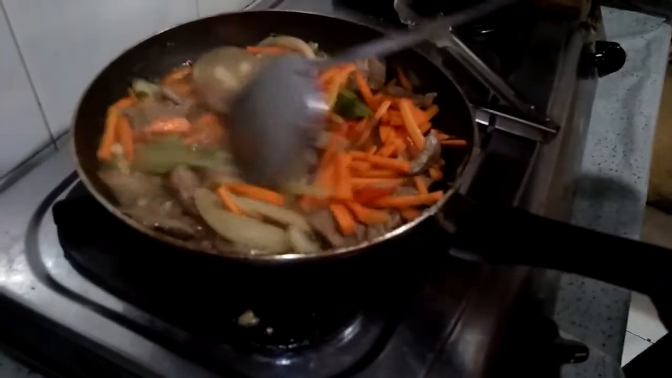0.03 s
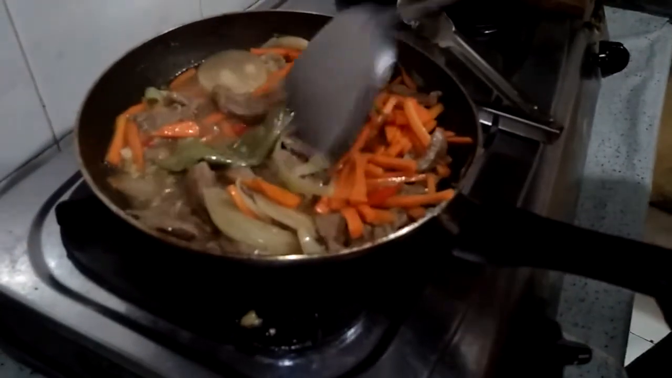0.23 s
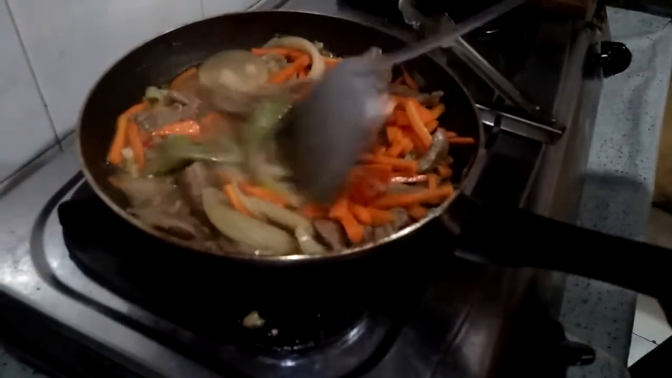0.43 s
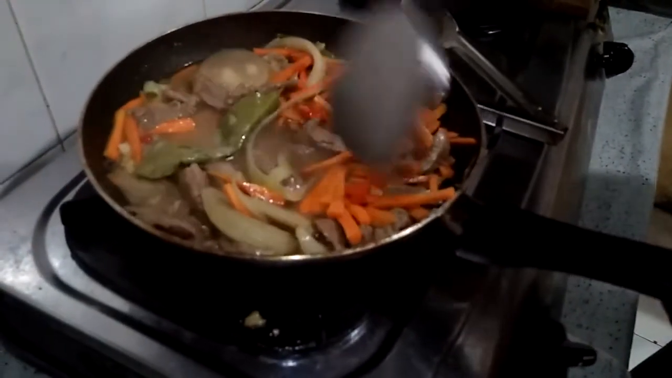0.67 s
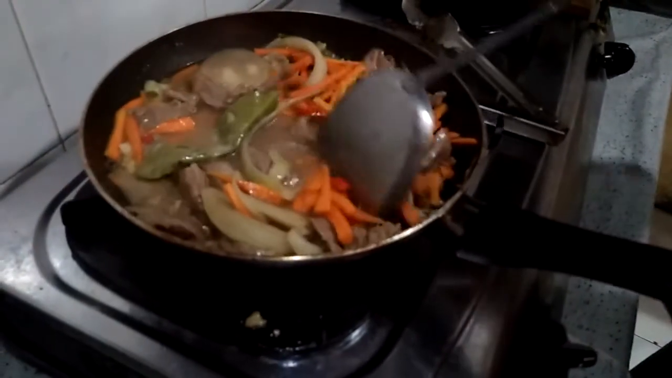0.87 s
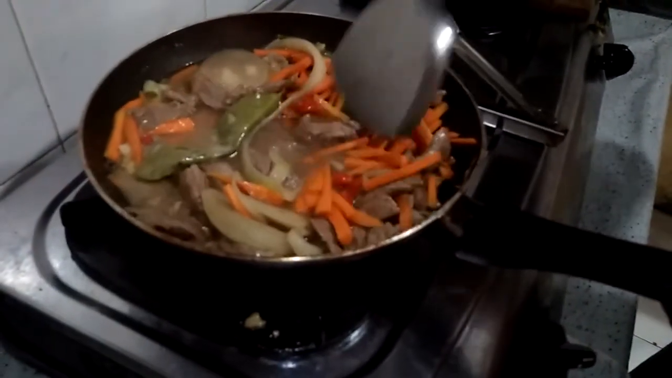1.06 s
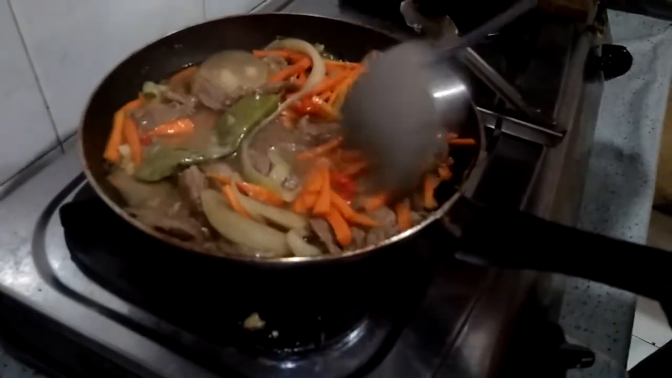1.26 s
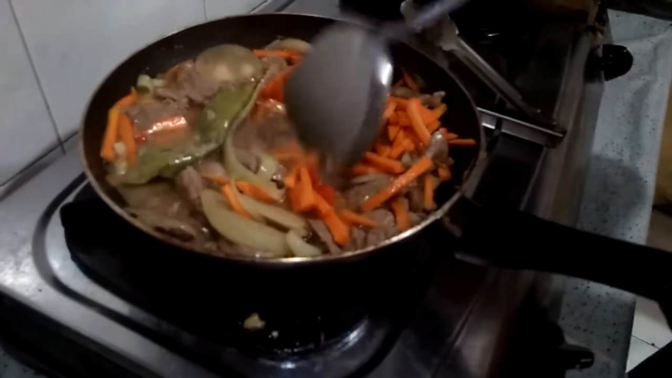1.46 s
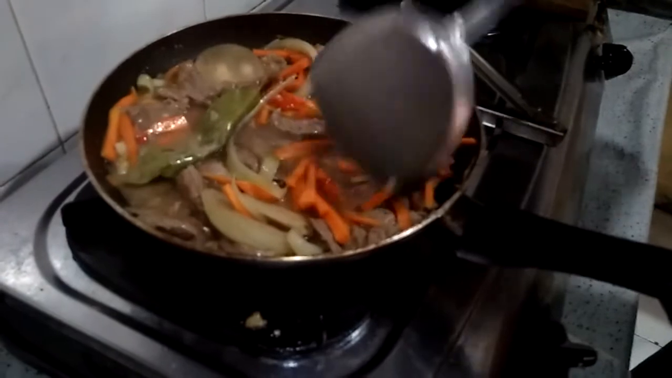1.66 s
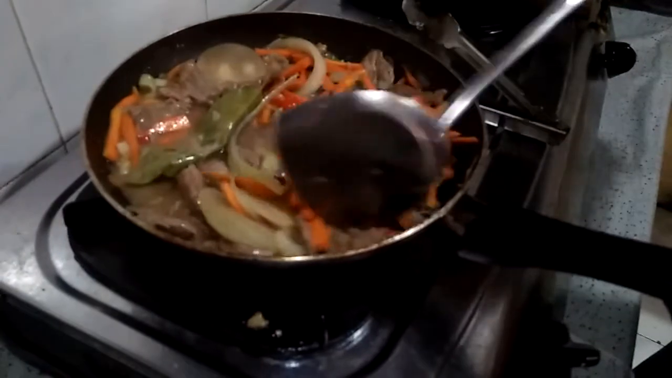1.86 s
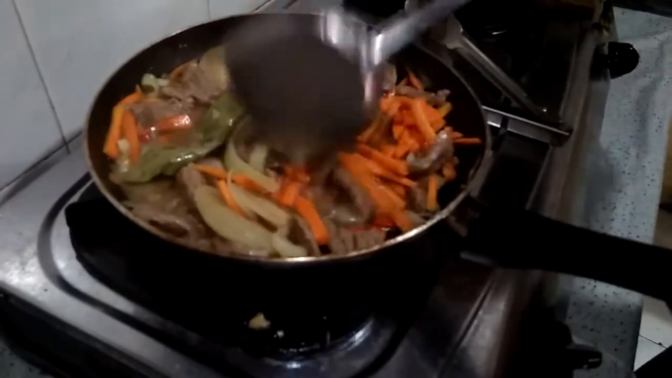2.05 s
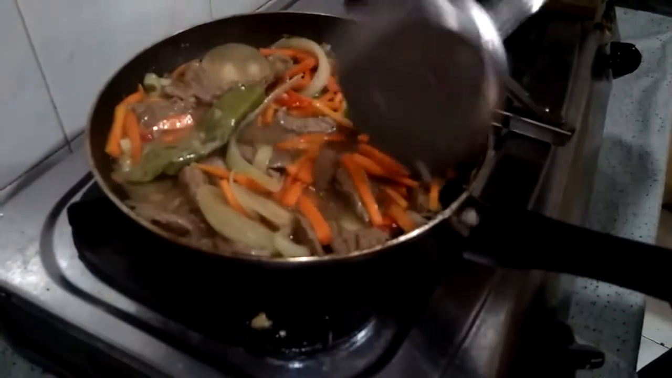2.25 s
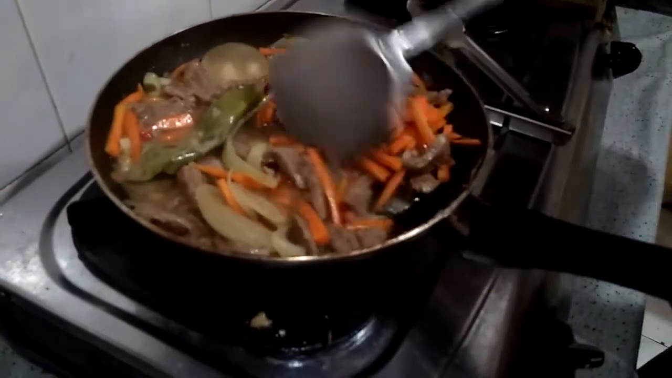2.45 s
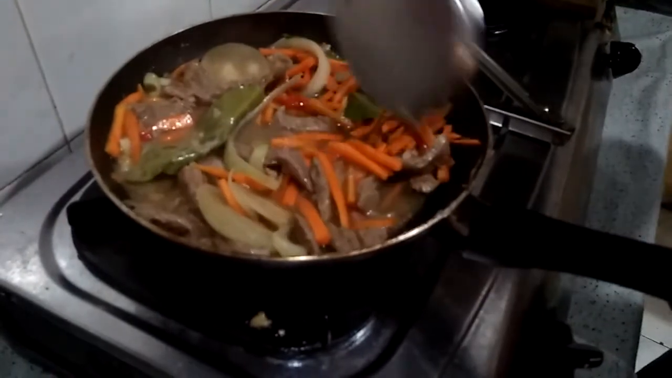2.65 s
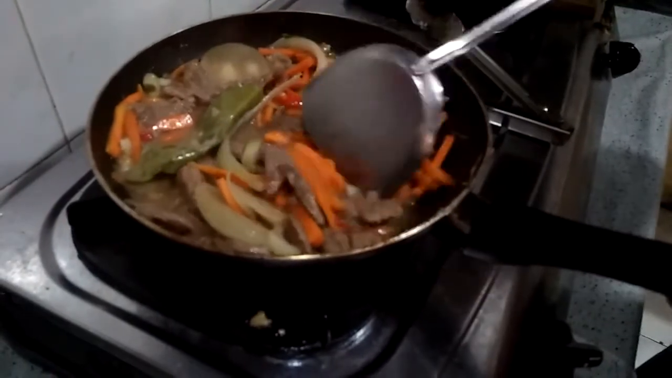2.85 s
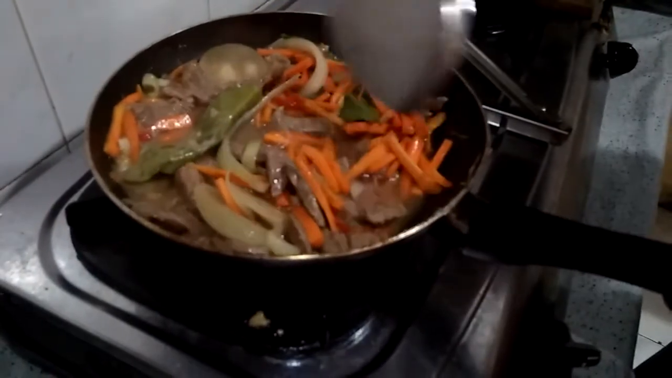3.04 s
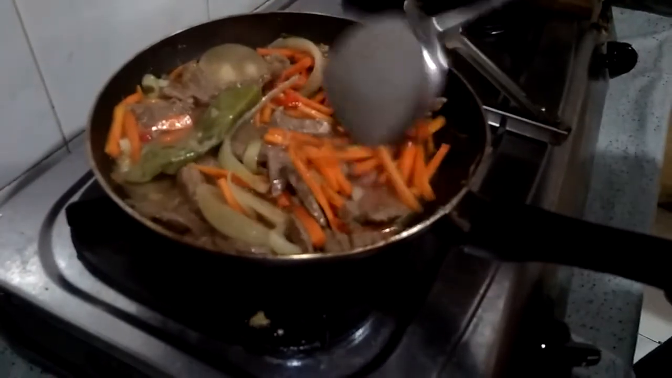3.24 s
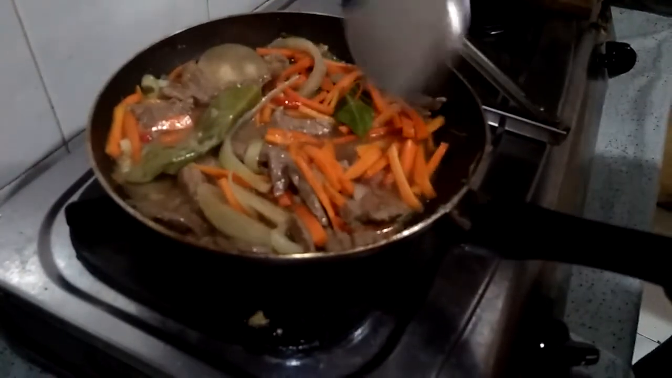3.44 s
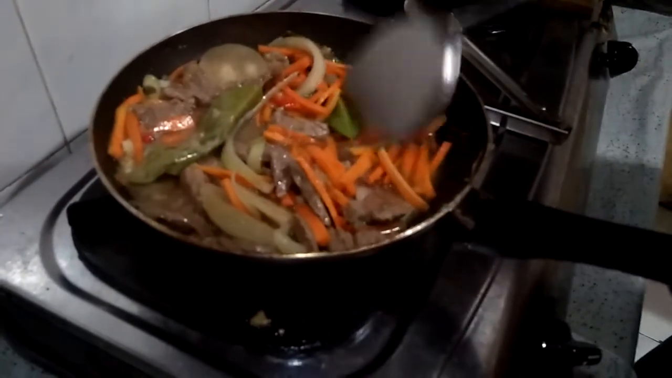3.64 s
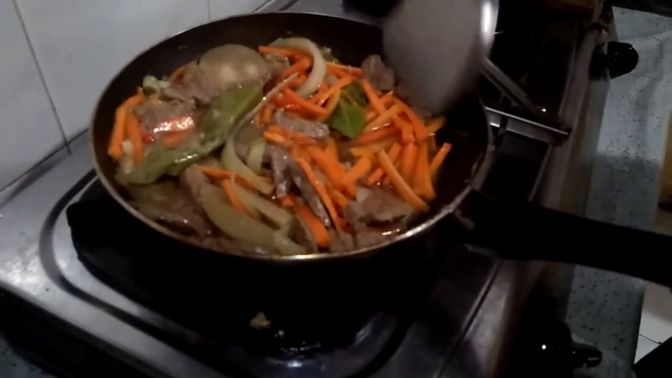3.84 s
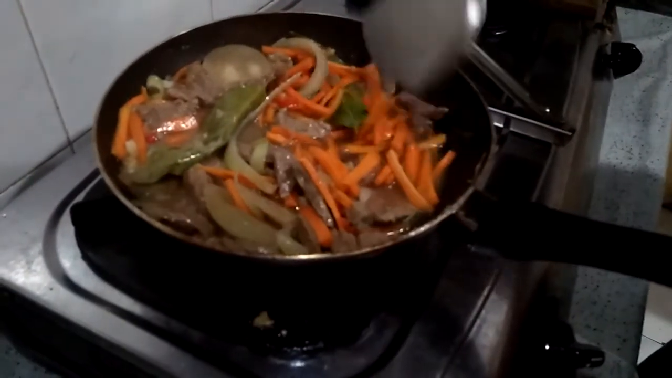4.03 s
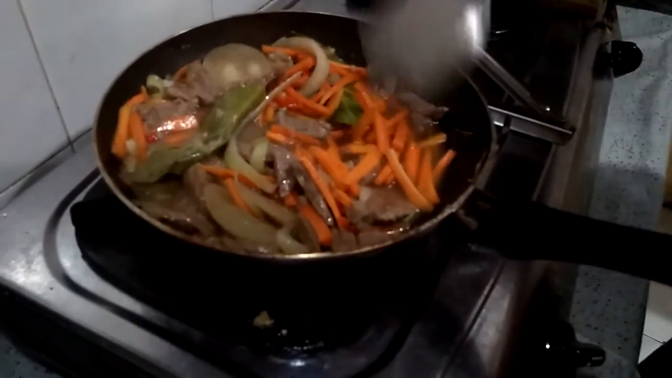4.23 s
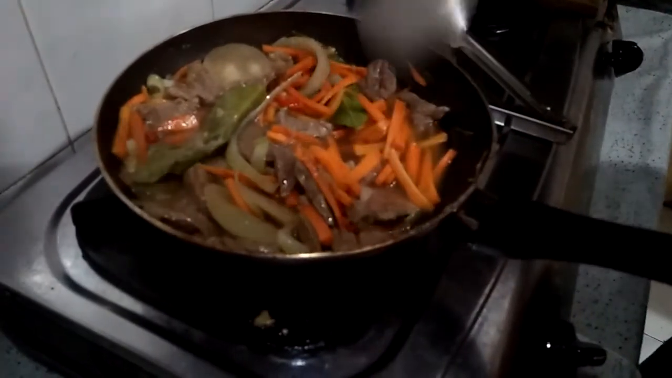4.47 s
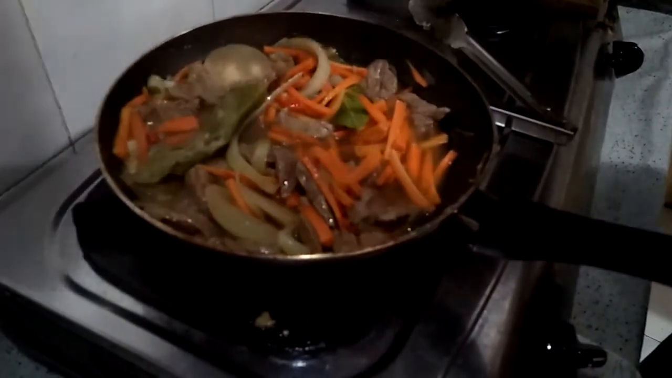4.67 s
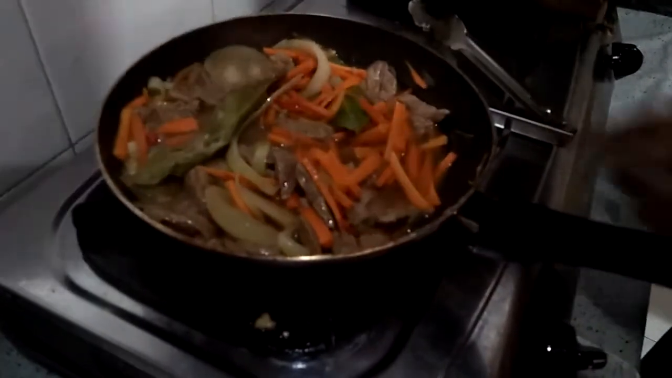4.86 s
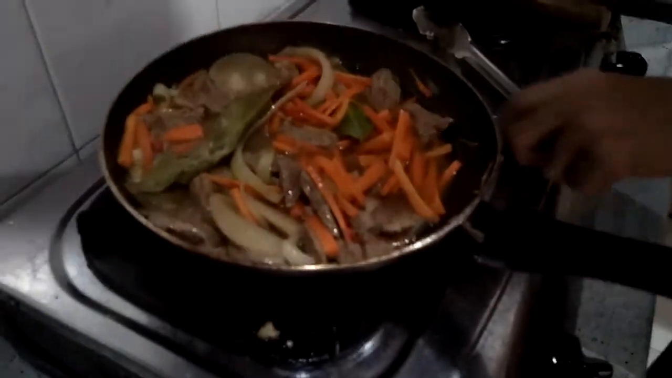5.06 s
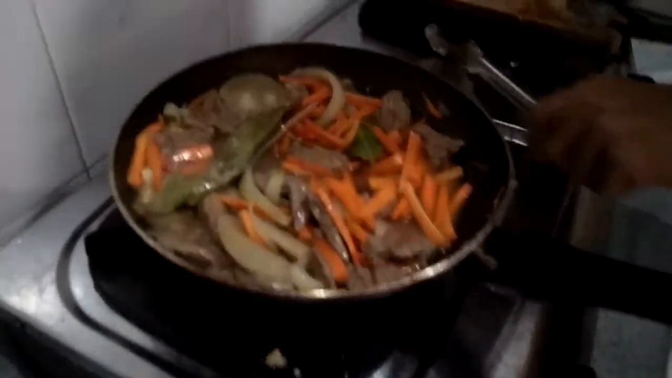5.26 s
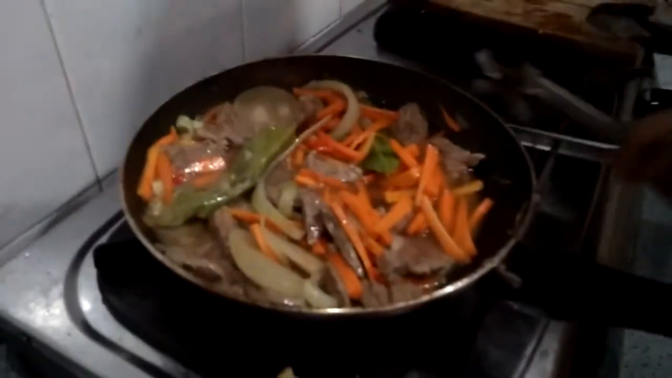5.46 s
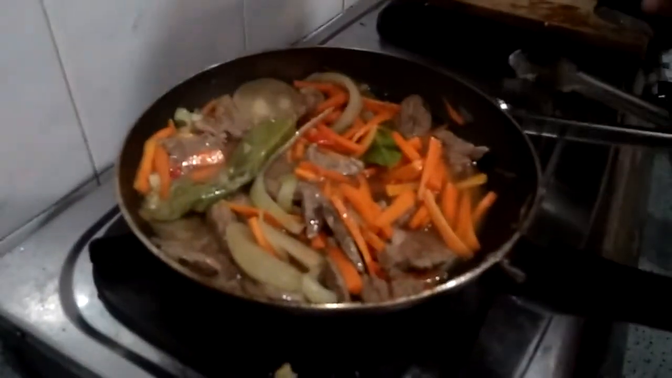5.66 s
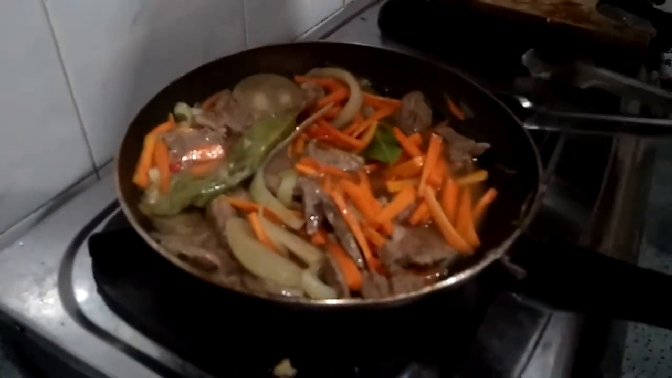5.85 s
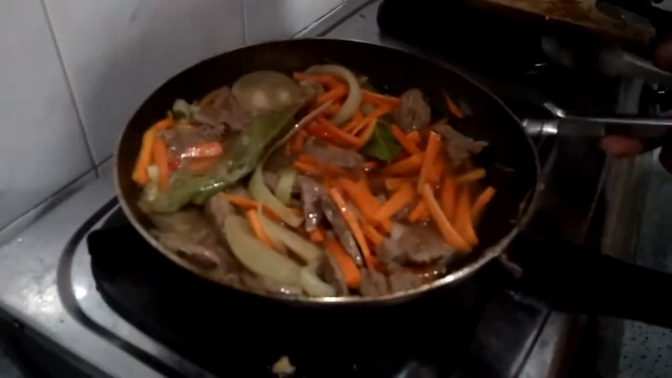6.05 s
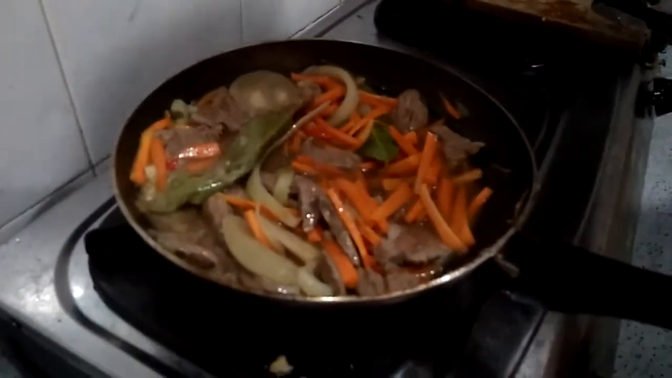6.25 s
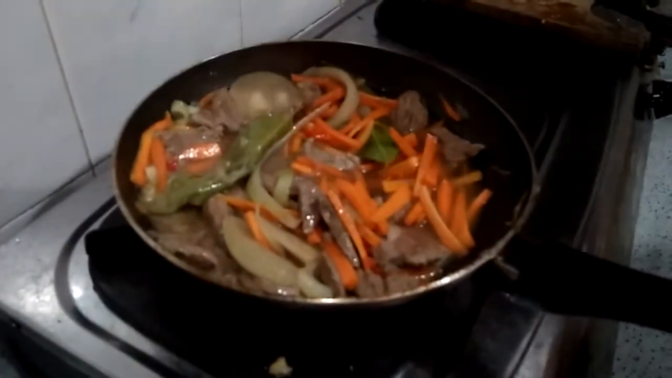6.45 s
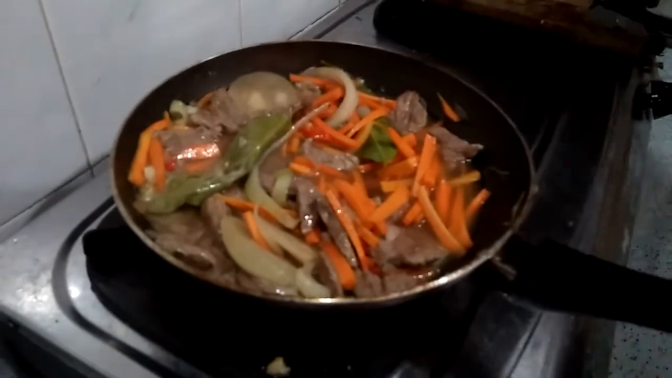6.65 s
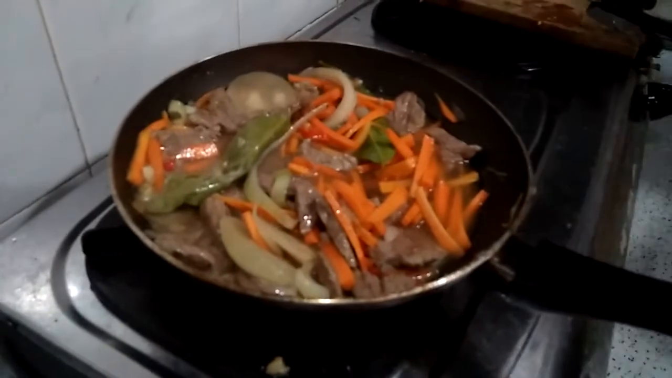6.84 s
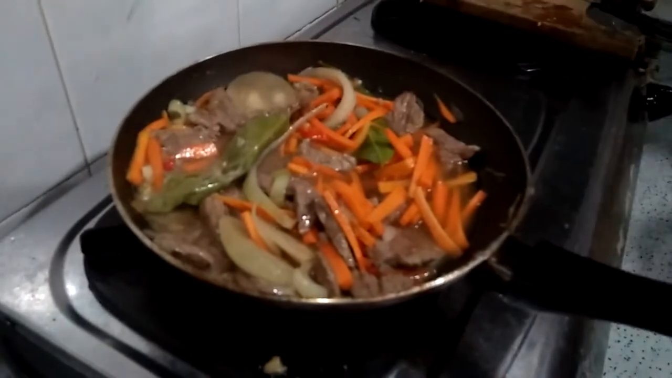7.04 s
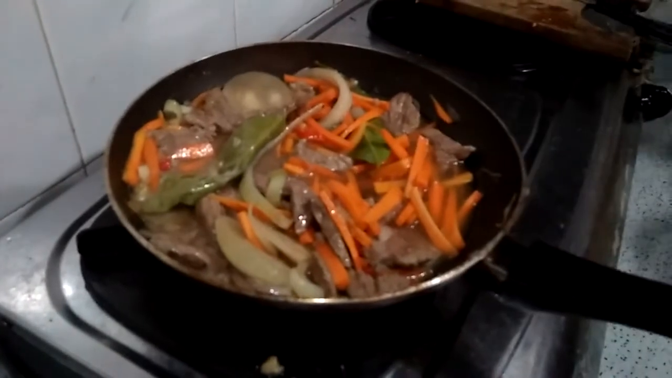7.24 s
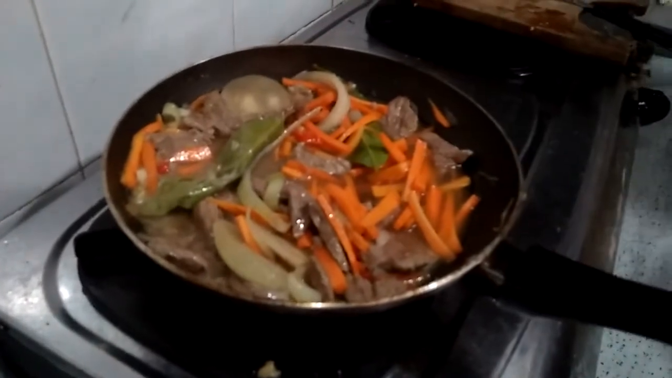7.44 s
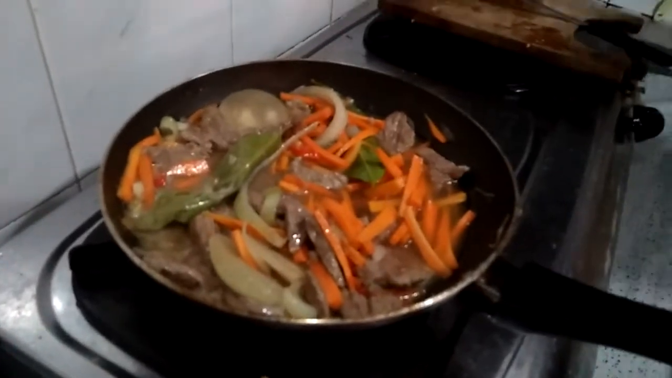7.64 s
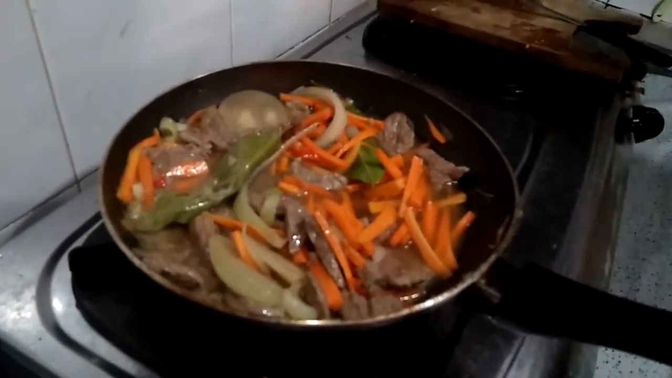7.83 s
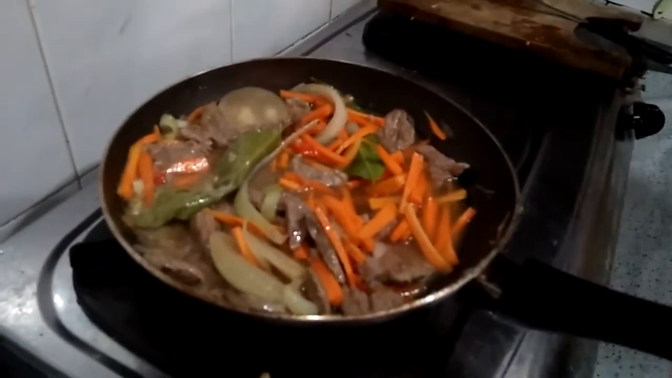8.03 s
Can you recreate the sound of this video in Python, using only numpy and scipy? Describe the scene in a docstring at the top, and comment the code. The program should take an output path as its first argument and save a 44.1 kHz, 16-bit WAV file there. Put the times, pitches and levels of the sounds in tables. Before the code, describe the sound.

In a small tiled kitchen, food sizzles and bubbles quietly in a frying pan while a metal spoon stirs with light ticks, short scrapes and faint pings. After about five seconds steel tongs are dragged over the stove top, rattling and knocking, then drop with a loud, bright clatter on a hard counter. A low rumble lies underneath. Close small microphone, with crisp treble.

```python
"""Stirring a pan, dropping tongs

Vegetables simmer quietly in a frying pan while a metal spoon stirs them, ticking and briefly dragging over the pan.
Then steel tongs are pulled over the stove top, rattle and are dropped on a hard counter; a low rumble lies under all.
Clicks and short noise bursts set steel modes ringing; the food and the rumble are shaped noise and random clicks.
The kitchen is tiled, and the rasp and sizzle are brightest near 10 kHz, as through a small microphone."""
import sys
import numpy as np
from scipy import signal
from scipy.fft import rfft, irfft, next_fast_len
from scipy.io import wavfile

SR = 44100
rng = np.random.default_rng(int(sys.argv[2]) if len(sys.argv) > 2 else 0)


def natural_amplitude(level_db):
    """Convert a level in decibels to a linear amplitude factor, elementwise."""
    exponent = np.asarray(level_db, float) / 20
    return 10 ** exponent


def to_wav(sig):
    """Store sig (one row per channel, or 1-D mono) as 16-bit WAV at the path in sys.argv[1].

    Samples outside -1..1 are clipped; the rate is SR.
    """
    pcm = np.clip(np.atleast_2d(sig), -1, 1) * 32767
    pcm = np.round(pcm).astype(np.int16)
    wavfile.write(sys.argv[1], SR, pcm.T)  # frames by channels


N = 357210   # samples, 8.1 s


def rms_one(x):
    """Scales a sound to an average (rms) level of 1."""
    return x / np.sqrt(np.mean(x ** 2) + 1e-20)


def in_time(rows):
    """Turns rows of (time, values) into smooth curves, one value per sample."""
    s, *columns = np.transpose(rows)
    return [np.interp(np.arange(N) / SR, s, column) for column in columns]


def colour(x, points):
    """Makes each pitch region louder or softer by points of (pitch_hz, level_db)."""
    size = next_fast_len(len(x))
    hz, db = np.transpose(points)
    log_hz = np.log(np.arange(size // 2 + 1) * SR / size + 1)
    gain = natural_amplitude(np.interp(log_hz, np.log(hz), db))
    return irfft(rfft(x, size) * gain, size)[:len(x)]


def drift(rate_hz):
    """A randomly wandering curve of spread 1: noise smoothed twice, worked out every 40 samples."""
    r = np.exp(-2 * np.pi * rate_hz * 40 / SR)
    noise = rng.standard_normal(N // 40 + 2002)
    slow = signal.lfilter([1], [1, -2 * r, r * r], noise)[2000:]   # skip the start-up
    return np.interp(np.arange(N) / 40, np.arange(len(slow)), rms_one(slow))


def grains(per_s, spread_db):
    """Random clicks of very uneven size, up or down."""
    sizes = natural_amplitude(spread_db * np.minimum(rng.exponential(1, N), 5)) * rng.choice([-1, 1], N)
    return sizes * (rng.random(N) < per_s / SR)


def ring(clicks, hz, t60):
    """Each unit click starts a sine of height 1 that fades by 60 dB in t60 seconds."""
    r, w = natural_amplitude(-60 / (max(t60, .005) * SR)), 2 * np.pi * hz / SR
    return signal.lfilter([0, np.sin(w)], [1, -2 * r * np.cos(w), r * r], clicks + 1e-18)


def rubbed(modes, force, damping):
    """One force drives all modes of a body at once; damping below 1 shortens the ringing; rms 1."""
    total = 0
    for k, (hz, db, t60) in enumerate(modes):
        total = total + natural_amplitude(db) * (-1) ** k * ring(force, hz, t60 * damping)
    return rms_one(total)


def struck(modes, times, peaks_db, contacts, tilts_db, damping):
    """Each blow swings every mode up over the contact time, with a strength and phase of its own."""
    chance, out = rng.standard_normal((len(times), len(modes))), 0
    phases = rng.uniform(0, 2 * np.pi, chance.shape)
    for k, (hz, db, t60) in enumerate(modes):
        force = np.zeros(N + 2000)
        tilt = tilts_db * np.log2(hz / modes[1][0])   # octaves from the second mode
        levels = natural_amplitude(peaks_db + db + 2.5 * chance[:, k] + tilt)
        for start, level, contact, phase in zip(times, levels, contacts, phases[:, k]):
            size = int(np.clip(contact * SR, 20, 1000))
            swing = np.cos(2 * np.pi * hz * np.arange(size) / SR + phase)
            force[int(start * SR):][:size] += level * swing * np.hanning(size) * 4 / size
        out = out + ring(force[:N], hz, t60 * damping)
    return out


def swells(times, peaks_db, rises, t60s):
    """Loudness curves of bursts that rise, then die away."""
    out, t = np.zeros(N + SR), np.arange(SR // 2) / SR
    for start, db, rise, t60 in zip(times, peaks_db, rises, t60s):
        shape = (1 - np.exp(-t / max(rise, .0002))) * natural_amplitude(-60 * t / max(t60, .01))
        out[int(start * SR):][:len(t)] += natural_amplitude(db) * shape / shape.max()
    return out[:N]


def tones(rows, rise_cycles):
    """Single fading tones that rise softly over some cycles of their pitch."""
    out, t = np.zeros(N + SR), np.arange(SR // 2) / SR
    for s, db, hz, t60 in rows:
        rise = rise_cycles / hz
        start = np.sin(np.pi / 2 * np.minimum(t / rise, 1)) ** 2
        fade = natural_amplitude(-60 * np.maximum(t - rise, 0) / max(t60, .01))
        out[int(s * SR):][:len(t)] += natural_amplitude(db) * start * fade * np.sin(2 * np.pi * hz * t)
    return out[:N]


def tail(t60):
    """Dying noise of energy 1: the answer of a room to a click."""
    t = np.arange(int(t60 * SR)) / SR
    return rms_one(rng.standard_normal(len(t)) * natural_amplitude(-60 * t / t60)) / np.sqrt(len(t))


# Blows of steel on steel; levels are relative, positive thinness favours the treble:
# start_s, chatter_db, knock_db, thinness_db, chatter_fade_s (by 60 dB)
STEEL_BLOWS = [(.186, -35.5, -56, 0, 0.086), (.4095, -42.5, -62, 10, 0.19), (.468, -39, -44, 3, 0.078),
               (.725, -38.5, -64, 11.5, 0.047), (1.065, -38, -59, -2, 0.097), (1.4656, -39, -46, 1, 0.052),
               (1.5211, -26.5, -44, 6.5, 0.043), (1.8756, -39.5, -59, 1, .12), (1.9203, -40, -65, 4, 0.058),
               (1.9562, -24, -41, 3, 0.016), (1.9697, -23.5, -39, 3.5, 0.063),
               (2.0018, -32.5, -32, -8, 0.055), (2.301, -45, -59, 9, 0.061), (2.571, -37.5, -59, 4, .1),
               (2.9627, -20.5, -40, 3, 0.03), (3.1617, -36.5, -77, 9.5, 0.047),
               (3.2772, -40, -49, 5, 0.039), (3.941, -44, -61, 9, 0.072), (4.2457, -42.5, -57, 2, 0.35),
               (4.3204, -48, -51, -5.5, 0.12), (4.6878, -40.5, -40.5, 5, .13),
               (5.0801, -38, -68, 11, 0.022), (5.1165, -36, -56, 0, 0.086),
               (5.1465, -20.5, -20.5, 0.5, 0.14), (5.227, -24, -53, 3, 0.072),
               (5.238, -13, -35, 6.5, 0.085), (5.2894, -30, -42, -11.5, 0.052), (5.4145, -23, -32, 2, 0.19),
               (5.4585, -24.5, -34, -2, 0.1), (5.619, -27, -29, -5.5, 0.11), (5.6403, -13, -9, -2.5, .058),
               (5.6876, -20.5, -20, 0, .06), (5.7294, -26, -29, 0, 0.079), (5.7928, -22.5, -41, 0, 0.033),
               (5.9893, -27.5, -37, 2, 0.093), (6.0516, -37, -33, -6, .15), (6.1377, -19, -44, 7, 0.03),
               (6.2109, -21, -65, 16, 0.023), (6.22, -20, -69, 1, 0.036), (6.2785, -20.5, -71, 12.5, 0.022),
               (6.2847, -21, -65, 5, 0.06), (6.3075, -12, -69, 10, 0.03), (6.3138, -15, -73, 3, 0.015),
               (6.321, -30, -65, 3, 0.016), (6.758, -34, -53, 6, 0.12), (6.9428, -14.5, -14, -1, 0.16),
               (7.013, 2, -17, -0.5, .04), (7.0329, -19, -21.5, -10, 0.068),
               (7.0875, -1.5, -20.5, 3.5, 0.041), (7.129, -16.5, -52, 5, 0.065),
               (7.1594, -21, -55, -6, 0.047), (7.2, -23.5, -44, 2.5, .11), (7.435, -43, -65, 6, .07)]
# What the tongs ring with: pitch_hz, level_db, fade_s (by 60 dB, before damping)
TONGS_MODES = [(3386, -14, 0.12), (3970, -27, 0.03), (5160, -23.5, .12), (6270, -6, 0.13),
               (7640, -17.5, 0.11), (7920, -6.5, 0.14), (8150, -2, .15), (8250, -8, .14), (8834, -3, 0.11),
               (10560, -9, .15), (9350, 6, .2), (9765, 7, .2), (10400, -3, 0.15), (10700, -10.5, 0.075),
               (10600, -1, .07), (13100, -1.5, 0.19)]
# The pan's upper ringing: pitch_hz, level_db, fade_s (by 60 dB, before damping)
PAN_UPPER_MODES = [(593, -8.5, 0.17), (697, -5, 0.11), (835, -5.5, 0.086), (989, -16, 0.51),
                   (950, -6.5, 0.15), (1064, 0, 0.05), (1260, -12, 0.038), (1272, -0.5, 0.055),
                   (1466, 5.5, 0.027), (1536, -10, 0.159), (1722, -9.5, 0.076), (1840, -0.5, 0.059),
                   (2128, -7.5, 0.018), (2342, -11, 0.049), (2730, -13.5, 0.048), (3115, -13, 0.0071),
                   (3900, -29, 0.017)]
# Colour of scraping steel: pitch_hz, level_db
RASP_COLOUR = [(880, -48), (1500, -29.5), (1990, -17.5), (2680, -18.5), (3490, -16), (4600, -18.5),
               (5830, -12), (6230, -11.5), (6790, -14), (9550, -1.5), (14500, -22)]


def blows():
    """Steel on steel: a crack, then chatter that dies fast and rings the tongs; the pan answers below."""
    s, chatter_db, knock_db, thinness_db, fades_s = np.transpose(STEEL_BLOWS)
    flat = np.zeros_like(s)
    rattle = rms_one(grains(9000, spread_db=3.5))
    steel = rms_one(colour(rattle, RASP_COLOUR)) + .5 * rubbed(TONGS_MODES, rattle, damping=1.0)
    thin = colour(steel, [(7000, -30), (11000, 0)])
    full = steel - thin
    # thin blows get more treble, full ones reach further down
    rises_s = flat + 0.0034
    chatter = thin * swells(s, chatter_db - 16.5 + thinness_db, rises_s, fades_s)
    chatter = chatter + full * swells(s, chatter_db - 16.5 - thinness_db, rises_s, fades_s)
    burst = rms_one(colour(rng.standard_normal(N), RASP_COLOUR))
    crack = burst * swells(s, chatter_db - 18.5, flat + 0.0001, flat + 0.006)
    by_tongs_db = np.where(s > 5.0, 0, -20)   # before 5 s the spoon in the food hardly rings
    clink = struck(TONGS_MODES, s, chatter_db + by_tongs_db - 31, flat + 0.0011, flat, damping=0.11)
    knock = struck(PAN_UPPER_MODES, s, knock_db - 15, flat + 0.005, flat, damping=0.45)
    steep = signal.butter(4, 520, "high", fs=SR, output="sos")   # thin steel has no low modes
    return signal.sosfilt(steep, chatter + crack + clink + knock)


# Strokes of steel dragged over steel; levels are relative:
# full_pressure_s, hold_s, low_modes_db, upper_modes_db, rasp_db
DRAG_STROKES = [(1.358, .11, -66, -64.5, -53.5), (2.025, 0.024, -44, -48.5, -40.5),
                (5.17, .02, -47, -46.5, -52), (5.273, 0.022, -60, -51, -24.5),
                (5.446, 0.083, -48, -52.5, -33.5), (5.55, 0.021, -72, -51.5, -35),
                (5.67, 0.011, -36, -36, -46), (5.766, 0.024, -40.5, -39, -32),
                (6.058, 0.048, -54, -47.5, -30.5), (6.11, 0.019, -59, -57, -36),
                (7.11, 0.057, -83, -54, -54)]
# The pan's low ringing: pitch_hz, level_db, fade_s (by 60 dB, before damping)
PAN_LOW_MODES = [(272, 1.5, 0.068), (306, 5.5, 0.22), (322, -1.5, 0.47), (439.9, 0.5, 0.29)]


def drags():
    """Stick and slip: dense uneven clicks ring the steel under a rasp; each stroke presses, holds and lifts."""
    t, pressure = np.arange(N) / SR, 0
    press_db_per_s, lift_db_per_s = 247, 284
    for s, hold, *levels_db in DRAG_STROKES:
        press_db = -press_db_per_s * np.maximum(s - t, 0)
        lift_db = -lift_db_per_s * np.maximum(t - s - hold, 0)
        pressure = pressure + natural_amplitude(levels_db)[:, None] * natural_amplitude(np.maximum(press_db + lift_db, -200))
    slips = rms_one(grains(1500 * natural_amplitude(5.0 * drift(30)), spread_db=1.0))
    low = rubbed(PAN_LOW_MODES, slips, damping=0.87) * pressure[0]
    upper = rubbed(PAN_UPPER_MODES, slips, damping=0.13) * pressure[1]
    grit = (slips + rng.standard_normal(N)) * natural_amplitude(3.5 * drift(25))   # the drag stutters
    rasp = rms_one(colour(grit, RASP_COLOUR)) + 0.12 * rubbed(TONGS_MODES, slips, damping=0.81)
    return low + upper + rasp * pressure[2] * natural_amplitude(-14.0)


# Soft knocks that set the pan ringing; levels are relative, and the boom takes only part of the brightness:
# start_s, knock_db, boom_db, brightness_db (per octave)
SOFT_KNOCKS = [(0.519, -41.5, -47, 5), (1.369, -49, -74, 14), (1.394, -43.5, -64, 9), (1.438, -46, -50, 13),
               (1.761, -44, -73, 5), (1.98, -49, -43.5, -2), (2.013, -49, -39, -16), (2.033, -46, -46, -1),
               (2.046, -25.5, -50, -15), (2.068, -44, -46, -13), (2.437, -25.5, -50, -7),
               (2.452, -65, -43.5, 9), (3.622, -41.5, -73, 13), (3.658, -39, -66, 2), (4.322, -44, -75, 14),
               (5.139, -38, -19.5, -18), (5.171, -28, -54, 9.5), (5.288, -39, -45, -4),
               (5.393, -34, -44, 9), (5.417, -32, -60, 14), (5.479, -32, -45, 15), (5.52, -40, -42.5, 10),
               (5.538, -26, -57, 2), (5.617, -31, -41, -2), (5.645, -11, -22, 11.5), (5.658, -10, -41, -12),
               (5.687, -19, -53, 2), (5.729, -37, -36, 7), (5.756, -22.5, -43, 8.5), (5.792, -26, -42, 4),
               (5.849, -42, -48.5, -14), (5.996, -35.5, -53, 12.5), (6.06, -27.5, -35.5, 13.5),
               (6.107, -26.5, -44, 13.5), (6.699, -40, -58.5, -12), (6.943, -12, -61, 14.5),
               (6.959, -28.5, -68, -1.5)]
# Colour of the thud: pitch_hz, level_db
THUD_COLOUR = [(290, -40), (500, -18.5), (825, 1), (1180, 1), (1370, -5), (1530, 3.5), (1680, -11),
               (1930, -10), (5000, -26), (6500, -55), (11000, -120)]


def knocks():
    """Duller contacts: a noisy thud, brighter for harder contacts, and the pan's own ringing."""
    s, knock_db, boom_db, tilts_db = np.transpose(SOFT_KNOCKS)
    contacts = np.full_like(s, 0.0095)   # seconds
    noise = rms_one(colour(rng.standard_normal(N), THUD_COLOUR))
    hard = colour(noise, [(1500, -30), (2300, 0)])
    soft = noise - hard
    hard_db = knock_db - 17 + 0.97 * tilts_db - 4.5
    thud = hard * swells(s, hard_db, contacts / 4, contacts * 8)
    thud = thud + soft * swells(s, knock_db - 17, contacts / 4, contacts * 8)
    upper = struck(PAN_UPPER_MODES, s, knock_db - 28.5, contacts, tilts_db, damping=0.49)
    boom = struck(PAN_LOW_MODES, s, boom_db - 7.5, contacts, .3 * tilts_db, damping=0.38)
    return thud + upper + boom


# Light touches of steel: the spoon, later other steel; the place touched favours modes near one pitch,
# food or hand damps them: start_s, level_db, favoured_pitch_hz, falloff_db (per octave), fade_s (by 60 dB)
STEEL_TOUCHES = [(0.103, -49, 1000, 90, 0.055), (.269, -57.5, 2430, 93, .2), (.487, -52, 1530, 90, .048),
                 (0.836, -53, 1510, 90, .058), (1.33, -63, 1540, 27, 0.27), (1.371, -51.5, 1950, 64, .037),
                 (1.41, -61, 2100, 42, .17), (1.47, -57, 2450, 60, 0.082), (1.979, -46, 1540, 90, .05),
                 (2.462, -59.5, 2270, 95, 0.25), (2.865, -60.5, 1510, 90, .069),
                 (3.257, -59.5, 1510, 90, 0.13), (3.565, -52, 2250, 97, 0.067), (3.58, -55, 1030, 90, .12),
                 (4.24, -52.5, 2750, 90, .048), (4.244, -45, 1540, 35, 0.038),
                 (4.32, -33.5, 1518, 52, 0.088), (4.326, -41.5, 2640, 67, 0.11),
                 (4.335, -50, 3770, 90, .068), (4.398, -60.5, 2730, 90, 0.14),
                 (4.484, -57, 1530, 90, 0.026), (4.664, -54, 2200, 90, 0.055),
                 (4.69, -63.5, 2250, 120, .38), (4.686, -49.5, 1530, 90, .07),
                 (6.86, -57.5, 2080, 93, 0.23), (6.943, -30.5, 2090, 39.5, 0.11),
                 (7.46, -62, 3800, 89.5, .04), (7.529, -56.5, 1840, 91.5, .14),
                 (7.84, -61.5, 1850, 87, 0.12), (7.961, -65, 2750, 88, 0.16)]
# What the touched steel pings with: pitch_hz, level_db
STEEL_PING_MODES = [(1020, 0), (1520, 2.5), (1850, -4), (1950, -4.5), (2090, -1), (2260, -2), (2435, -2.5),
                    (2740, 1), (3770, -6)]
# The spoon's edge sings while it drags: start_s, level_db, pitch_hz, fade_s (by 60 dB)
EDGE_SQUEALS = [(2.02, -35, 1023, .06), (2.0, -41, 1550, .07), (2.005, -40, 904, .08)]


def pings():
    """Steel tones, a little rough; the pings come back from a wall and hang in the room, the squeals do not."""
    rough, lag = 1 + .45 * drift(70), int(.034 * SR)   # the wall echo is 34 ms late
    rows = []
    for s, db, near_hz, falloff_db, t60 in STEEL_TOUCHES:
        for hz, mode_db in STEEL_PING_MODES:
            rows.append((s, db + mode_db - falloff_db * abs(np.log2(hz / near_hz)), hz, t60))
    direct = tones(rows, rise_cycles=14.0) * rough
    echo = natural_amplitude(-17.5) * np.concatenate([np.zeros(lag), direct[:-lag]])
    hang = natural_amplitude(-11.5) * signal.fftconvolve(direct, tail(0.55))[:N]
    squeals = tones(EDGE_SQUEALS, rise_cycles=57.0) * rough
    return direct + echo + hang + squeals


# Level of the sizzle, which comes and goes as the food is turned: time_s, level_db
SIZZLE_LEVEL = [(0.0, -58.5), (.55, -60.5), (.714, -56.5), (.988, -63.5), (1.158, -61), (1.274, -77.5),
                (1.428, -66), (1.582, -57.5), (1.75, -62), (1.9, -57), (2.25, -68), (2.4, -60),
                (2.63, -72.5), (2.95, -60.5), (3.25, -67), (3.57, -63), (3.8, -66), (4.12, -60.5),
                (4.4, -69), (5.05, -61.5), (6.45, -61), (6.772, -66.5), (7.35, -63), (7.772, -68.5),
                (8.1, -68)]
# Colour of the sizzle: pitch_hz, level_db
SIZZLE_COLOUR = [(2060, -48.5), (3500, -36.5), (4010, -31.5), (4550, -21), (4970, -23.5), (5800, -19),
                 (7630, -8), (9560, -2.5), (13700, -15), (14500, -9)]


def sizzle():
    """Fine bubbles burst in the sauce: clicks and hiss, in four treble bands that waver separately."""
    level_db, = in_time(SIZZLE_LEVEL)
    bursts = rms_one(grains(2500 * natural_amplitude(4.0 * drift(12)), spread_db=4.5))
    fizz = rms_one(colour(bursts + 1.1 * rng.standard_normal(N), SIZZLE_COLOUR))
    edges_hz, total = [2000, 5500, 8000, 11000, 19000], 0
    # bubbles of different size come in patches of their own
    for k, band_hz in enumerate(zip(edges_hz, edges_hz[1:])):
        band = signal.butter(2, band_hz, "band", fs=SR, output="sos")
        total = total + signal.sosfilt(band, fizz) * (-1) ** k * natural_amplitude(1.5 * drift(14))
    return total * natural_amplitude(level_db + 1.9 * drift(38))


def bubbles(per_s):
    """Larger bubbles plop at random, ringing a few cycles at pitches over two octaves; rms 1."""
    born = grains(per_s * natural_amplitude(2.8 * drift(3.9)), spread_db=3.5)
    dealt = rng.integers(0, 16, N)   # which pitch each bubble gets
    total = 0
    for k, hz in enumerate(np.geomspace(700, 3300, num=16)):
        total = total + ring(born * (dealt == k), hz, 26.0 / hz) * (700 / hz) ** 0.45
    return rms_one(total)


# The quiet background, in relative levels: time_s, murmur_db, pan_hum_db
BACKGROUND_LEVELS = [(0.0, -57, -73.5), (.7, -58.5, -67), (1.4, -60, -69.5), (1.9, -61, -70.5),
                     (2.3, -64.5, -68), (3.3, -63.5, -77), (3.8, -59, -70), (4.33, -61, -70.5),
                     (4.55, -64, -75), (5.05, -63, -70), (6.8, -62.5, -82), (8.1, -63.5, -76.5)]
# Colour of the murmur: pitch_hz, level_db
MURMUR_COLOUR = [(88, -44.5), (150, -1.5), (262, -3), (303, -11.5), (367, -6), (419, -7.5), (514, -11),
                 (787, 0.5), (953, -5), (1500, -10.5), (1690, -11), (2580, -17), (5000, -27.5), (6500, -63),
                 (11000, -120)]


def murmur_and_hum():
    """The kitchen murmurs as shaped noise with plopping bubbles; steady noise keeps the pan's low modes humming."""
    murmur_db, hum_db = in_time(BACKGROUND_LEVELS)
    murmur = rms_one(colour(rng.standard_normal(N), MURMUR_COLOUR)) + .4 * bubbles(per_s=150)
    murmur = murmur * natural_amplitude(murmur_db - 3.58 + 1.7 * drift(4.3) + 1.7 * drift(1.4))
    hum = rubbed(PAN_LOW_MODES, rng.standard_normal(N), damping=0.57)
    return murmur + hum * natural_amplitude(hum_db + 3.0 * drift(1.6))


# Level of the rumble: time_s, level_db
RUMBLE_LEVEL = [(0.0, -54), (.11, -66.5), (.34, -59), (1.26, -63), (1.74, -66), (2.2, -60), (2.55, -66.5),
                (3.09, -63), (3.47, -69), (3.61, -62.5), (4.4, -65.5), (5.26, -57.5), (5.48, -64),
                (5.68, -46.5), (5.86, -56.5), (6.68, -65), (7.4, -73), (7.71, -59), (7.96, -76),
                (8.1, -72.5)]
# Colour of the rumble: pitch_hz, level_db
LOW_COLOUR = [(18, -33.5), (30, -8.5), (43, 5), (57, 6.5), (96, -5), (107, -4.5), (135, -6), (166, -10),
              (220, -15), (290, -48), (480, -120)]
# Dull thumps: start_s, level_db, pitch_hz, fade_s (by 60 dB)
DULL_THUMPS = [(3.667, -51, 97, 0.076), (5.159, -40, 133, 0.15), (5.651, -38.5, 68.6, 0.18),
               (6.357, -50.5, 126, 0.11), (7.574, -41.5, 119, 0.19), (7.663, -48.5, 108, 0.13),
               (7.889, -62, 52.2, 0.15)]


def rumble():
    """Lumpy low noise, with a few dull thumps through the floor and counter."""
    level_db, = in_time(RUMBLE_LEVEL)
    noise = rms_one(colour(rng.standard_normal(N), LOW_COLOUR))
    return noise * natural_amplitude(level_db + 1.5 * drift(7)) + tones(DULL_THUMPS, rise_cycles=.9)


# Side against middle, before its lower part is cut further: pitch_hz, level_db
STEREO_WIDTH = [(2500, -70), (4500, -21), (8000, -13.5), (12000, -10)]


def widen(mid):
    """Makes two channels that differ only in the treble, by a flickering copy turned a quarter cycle."""
    quarter_turn = signal.hilbert(colour(mid, STEREO_WIDTH), next_fast_len(N))[:N].imag
    side = colour(quarter_turn * drift(150), [(2500, -40), (4000, 0)])
    return np.array([mid + side, mid - side])


def scene():
    """Drags, blows and knocks ring in the kitchen; pings, simmering food and rumble join them."""
    handling = drags() + blows() + knocks()
    no_bass = signal.butter(4, 200, "high", fs=SR, output="sos")   # a small pan radiates no bass
    handling = signal.sosfilt(no_bass, handling)
    room = natural_amplitude(-4.5) * signal.fftconvolve(handling, tail(0.34))[:N]
    return widen(handling + room + pings() + sizzle() + murmur_and_hum() + rumble())


def top_cut(x):
    """Nothing passes above the cut-off."""
    return signal.sosfilt(signal.butter(12, 15460, fs=SR, output="sos"), x)


def record(dry):
    """Cuts the top steeply towards 14.5 kHz and the deepest bass below 43 Hz."""
    no_top = signal.cheby2(16, 36, 14500, fs=SR, output="sos")
    no_deep_bass = signal.butter(4, 43, "high", fs=SR, output="sos")
    mix = signal.sosfilt(no_deep_bass, signal.sosfilt(no_top, dry))
    return top_cut(mix)


dry = scene()
out = record(dry)
to_wav(out)
```